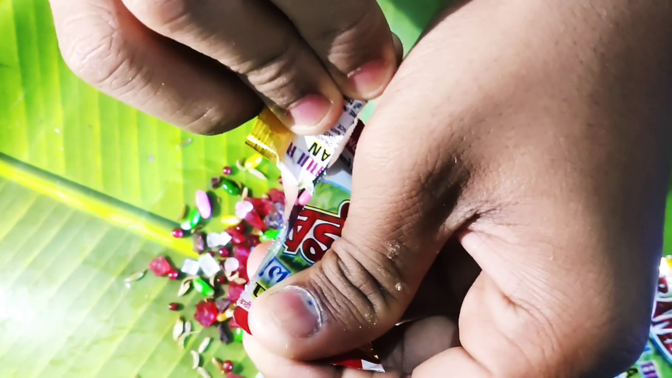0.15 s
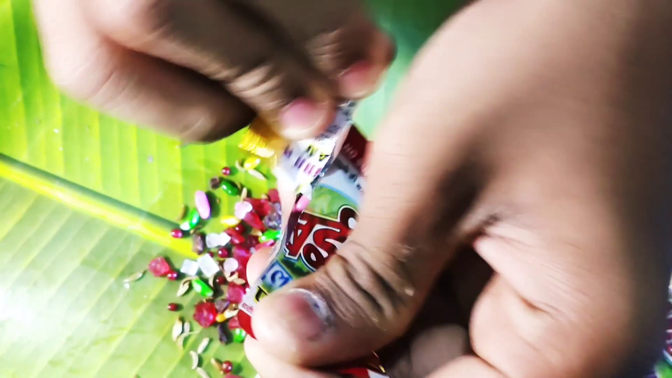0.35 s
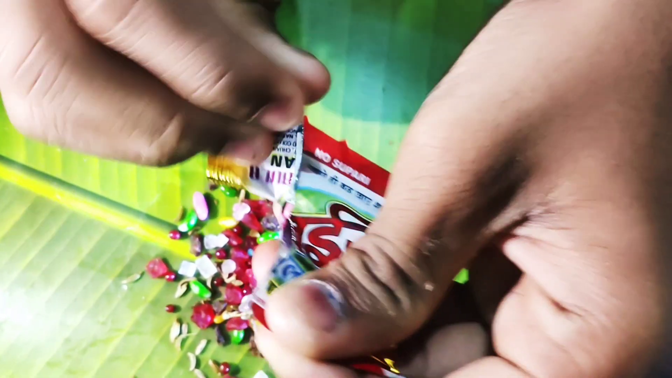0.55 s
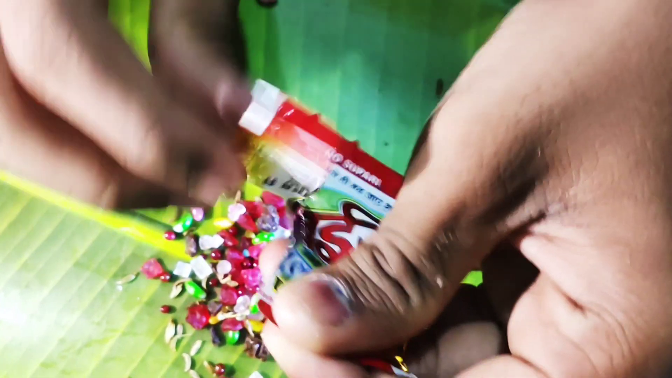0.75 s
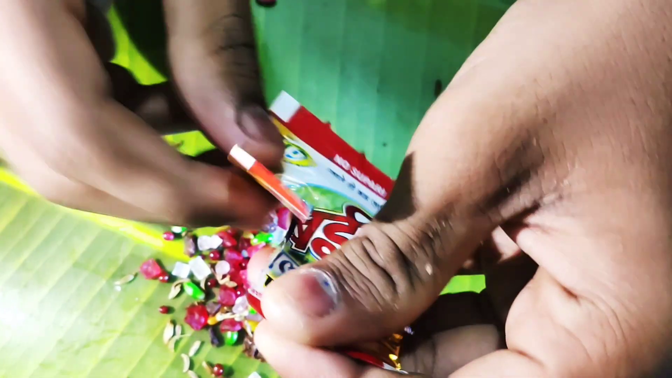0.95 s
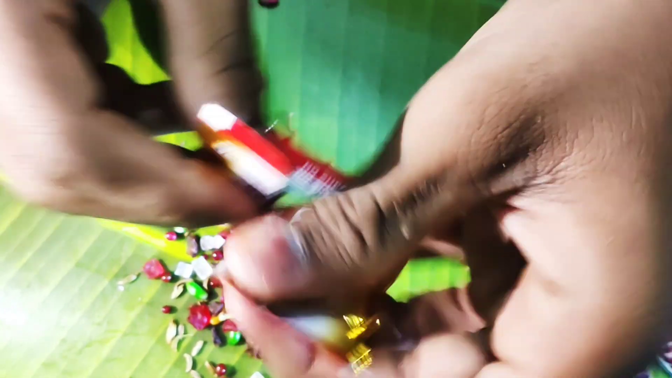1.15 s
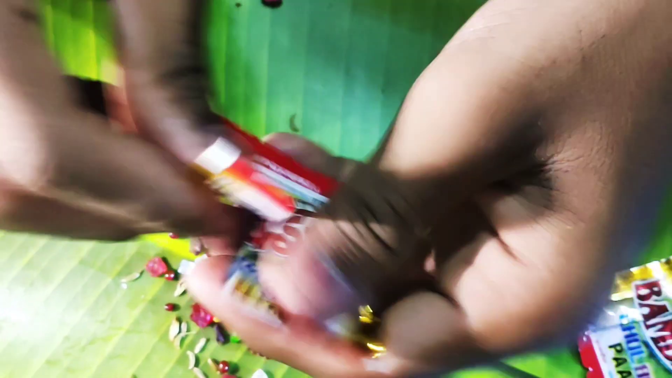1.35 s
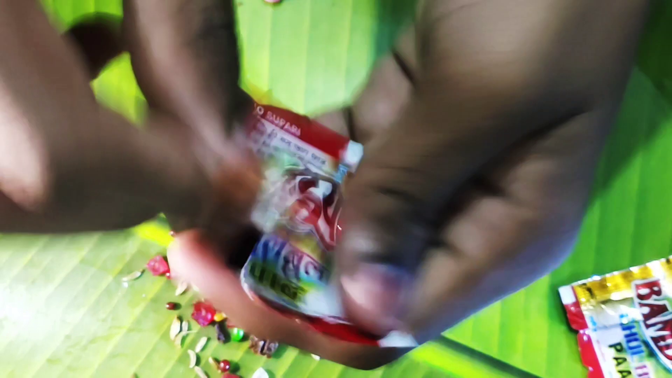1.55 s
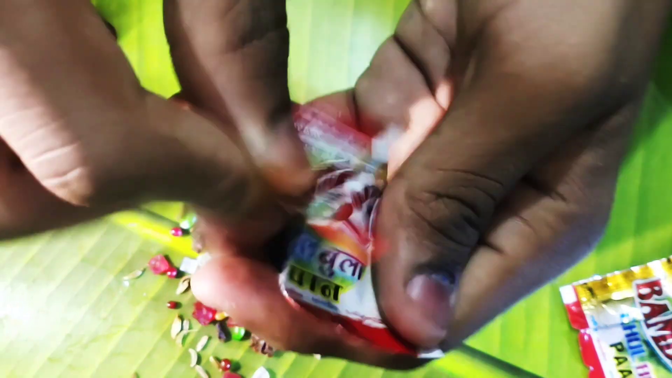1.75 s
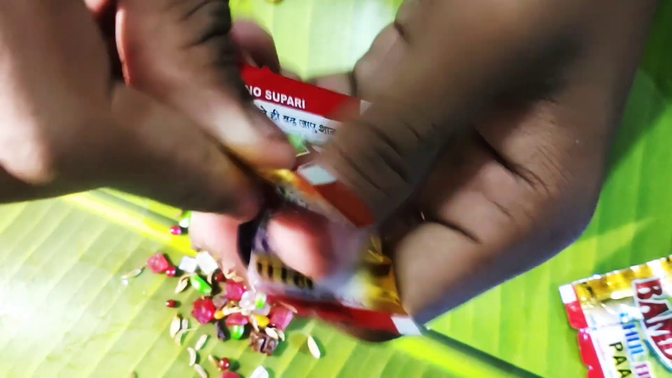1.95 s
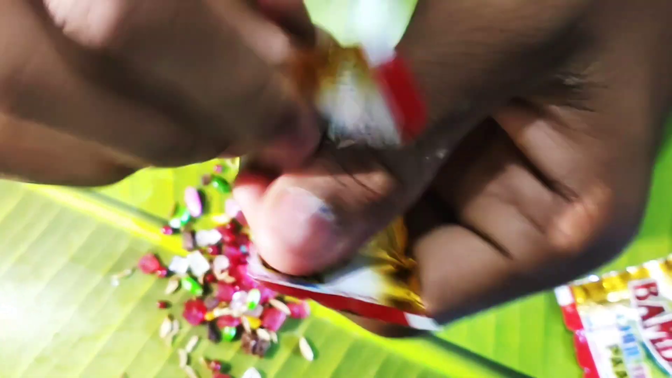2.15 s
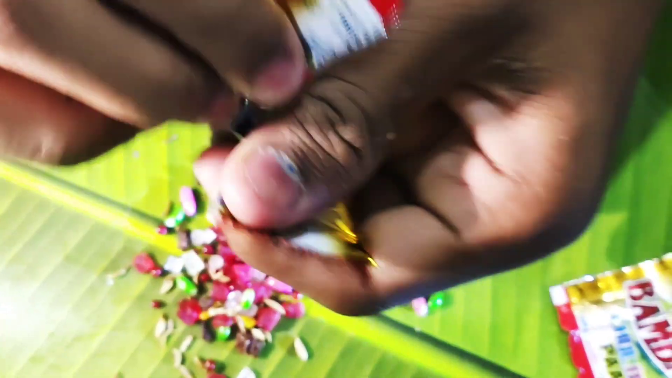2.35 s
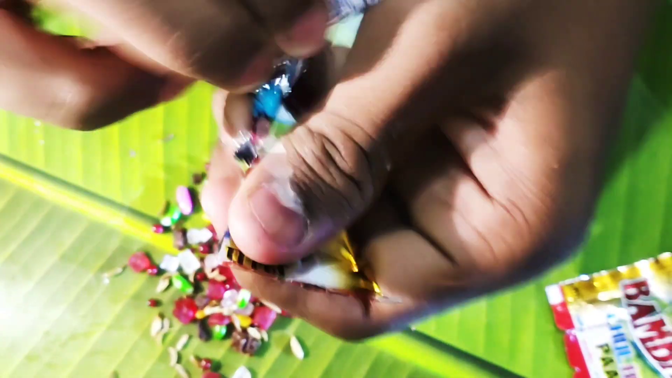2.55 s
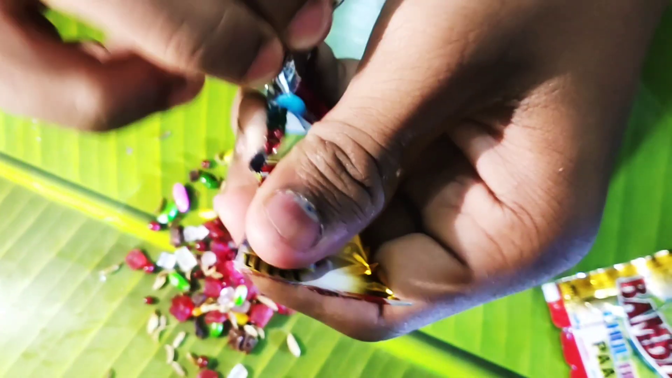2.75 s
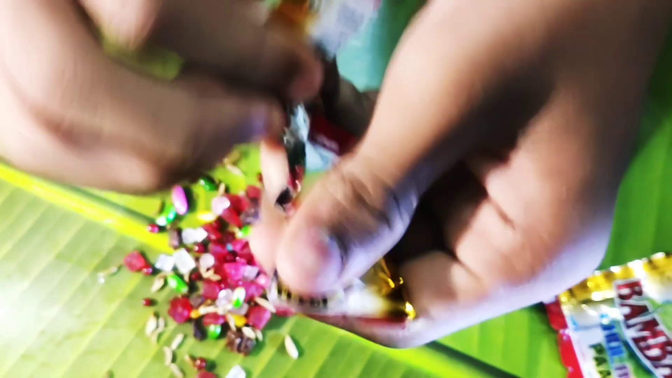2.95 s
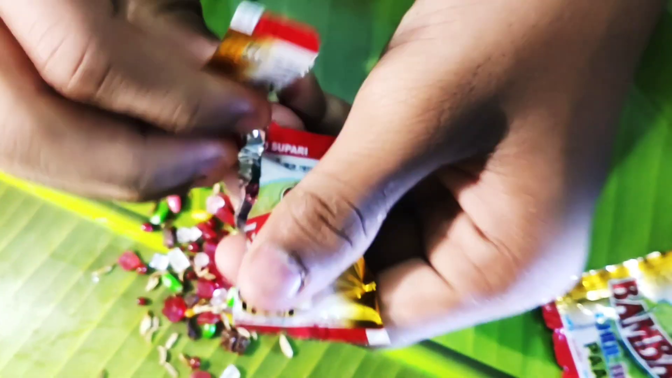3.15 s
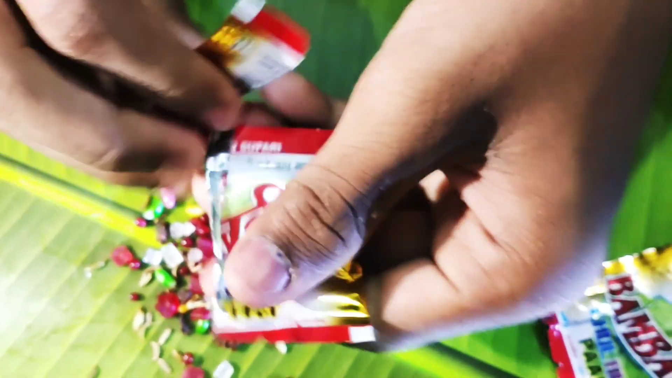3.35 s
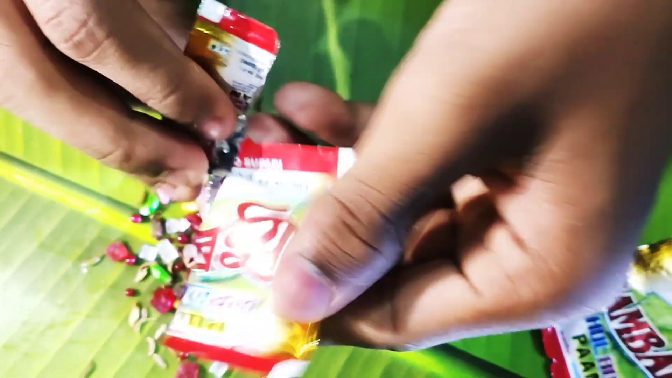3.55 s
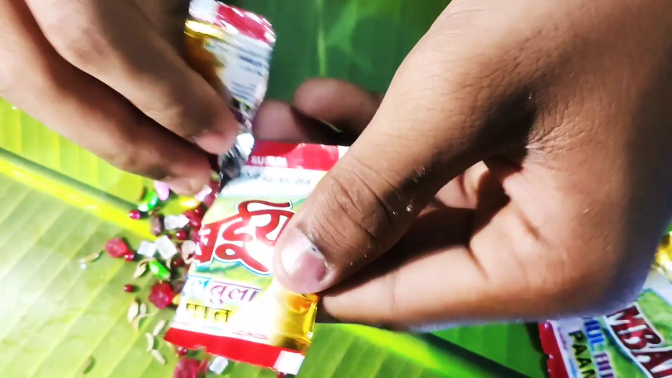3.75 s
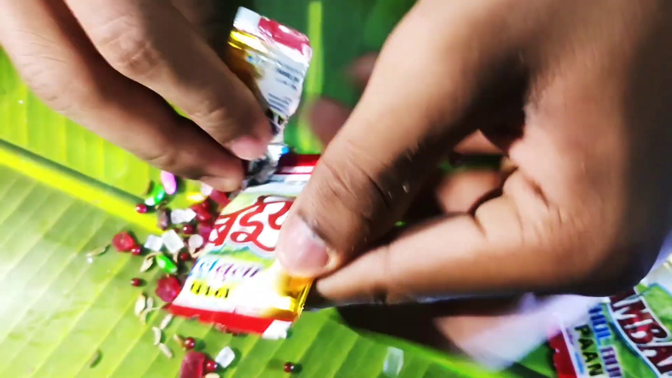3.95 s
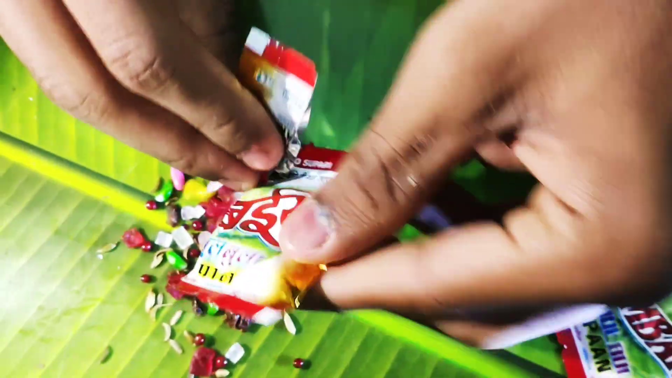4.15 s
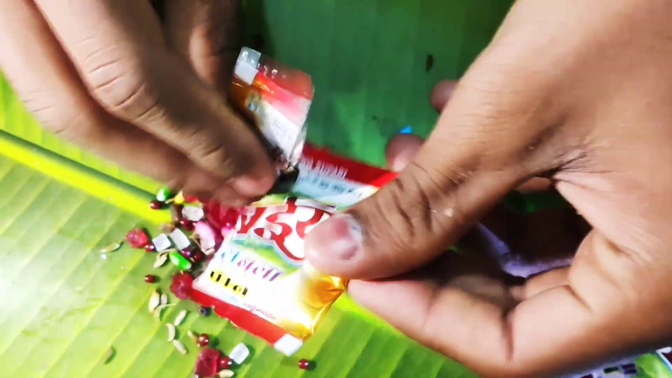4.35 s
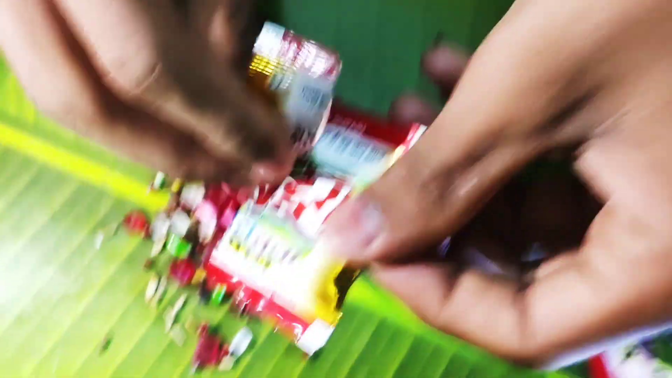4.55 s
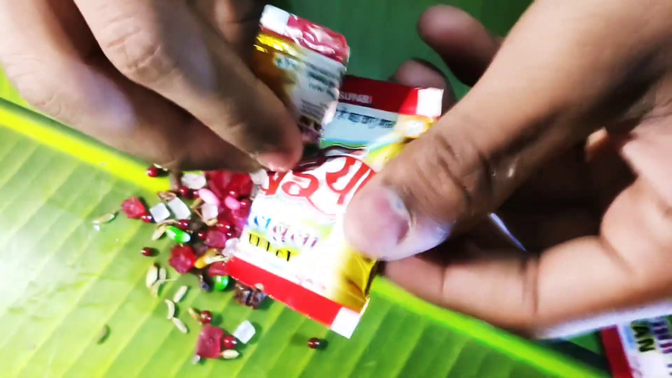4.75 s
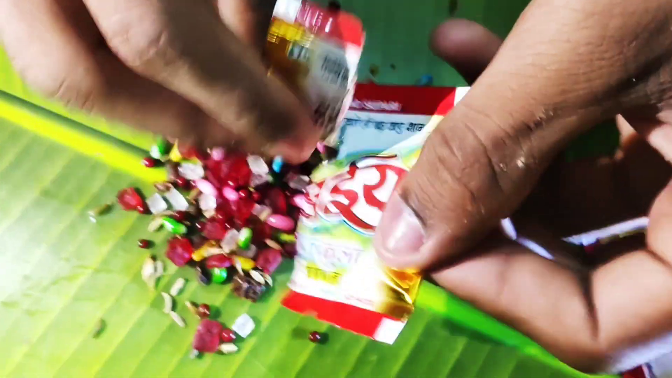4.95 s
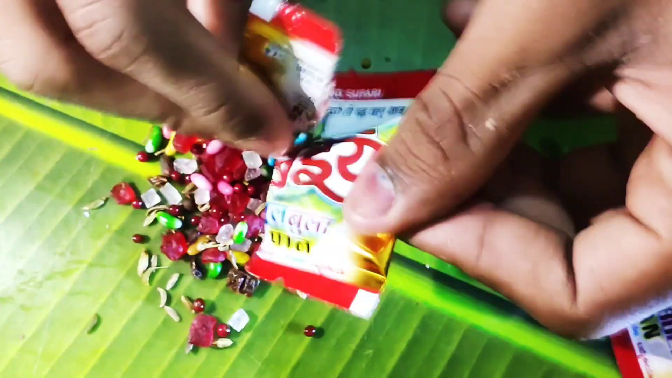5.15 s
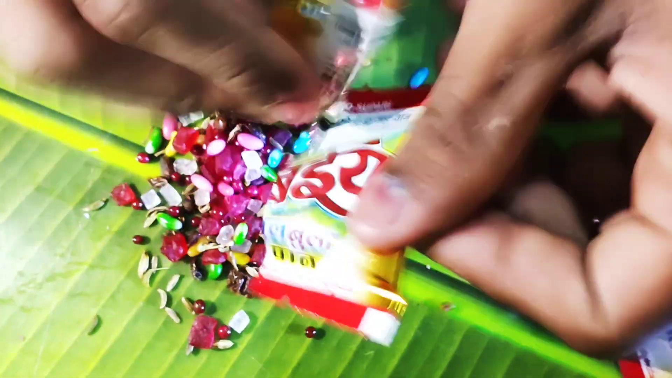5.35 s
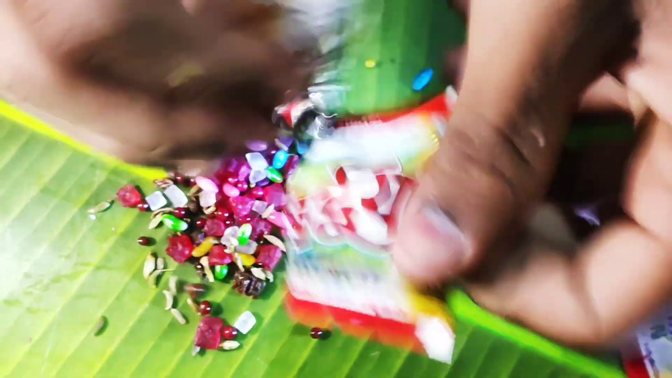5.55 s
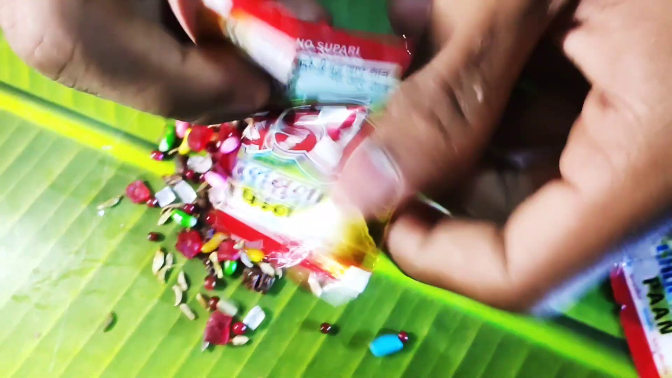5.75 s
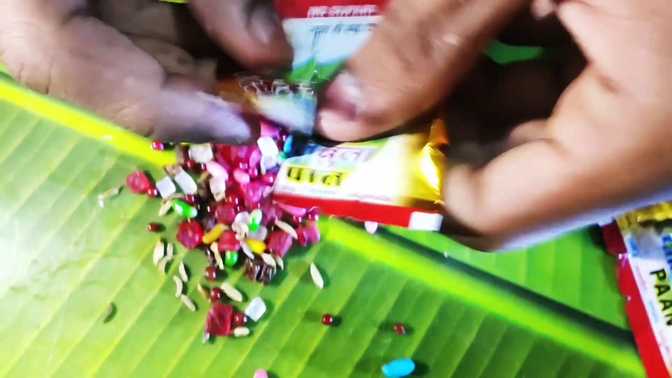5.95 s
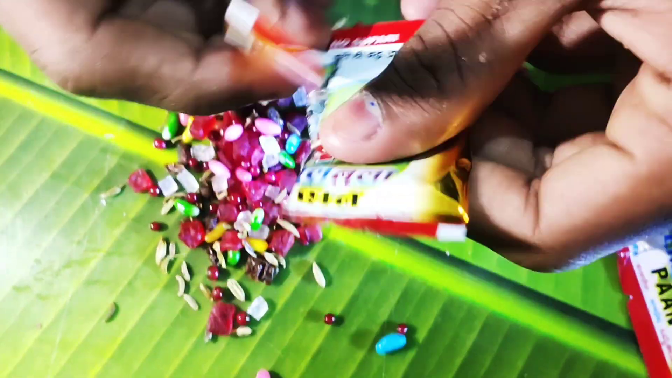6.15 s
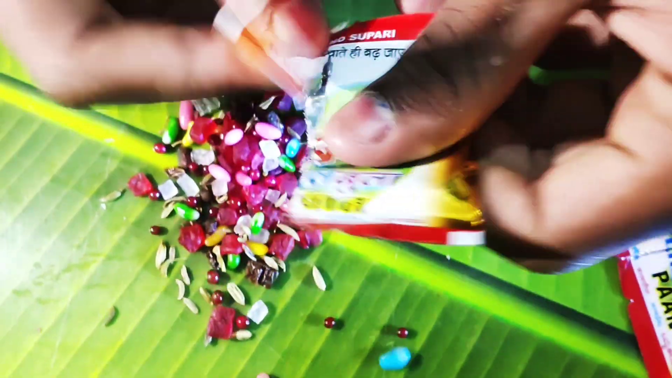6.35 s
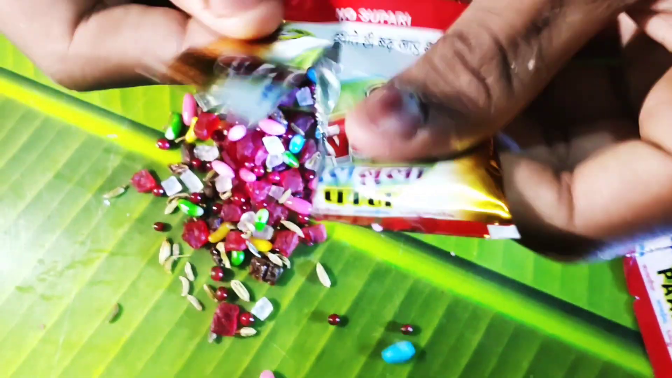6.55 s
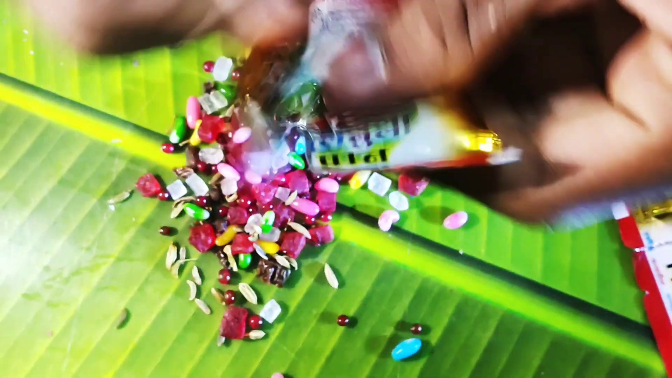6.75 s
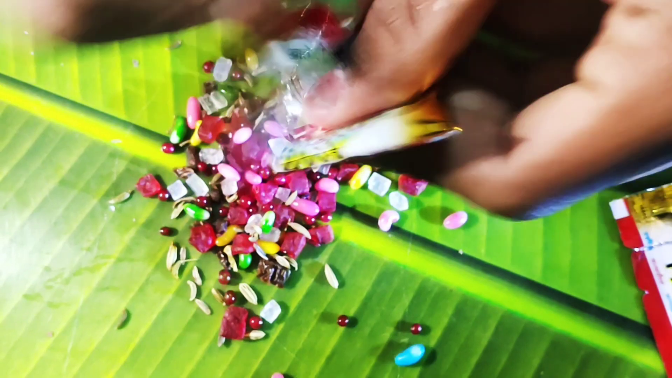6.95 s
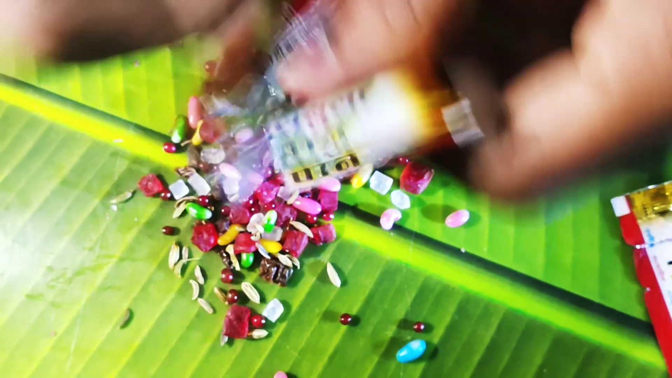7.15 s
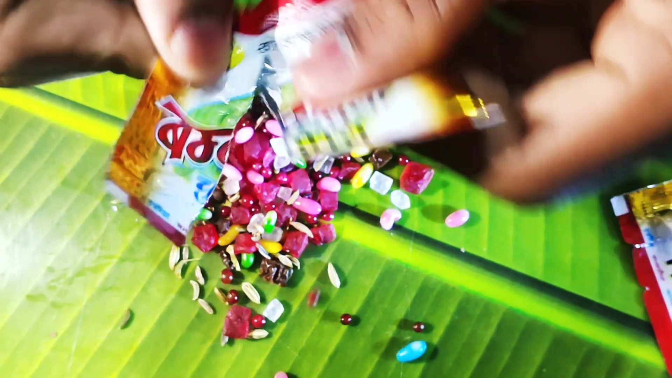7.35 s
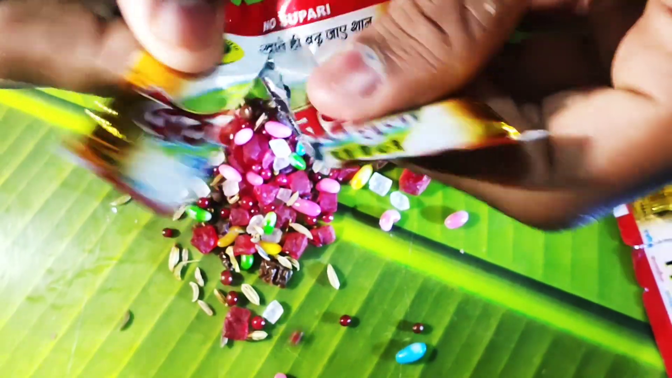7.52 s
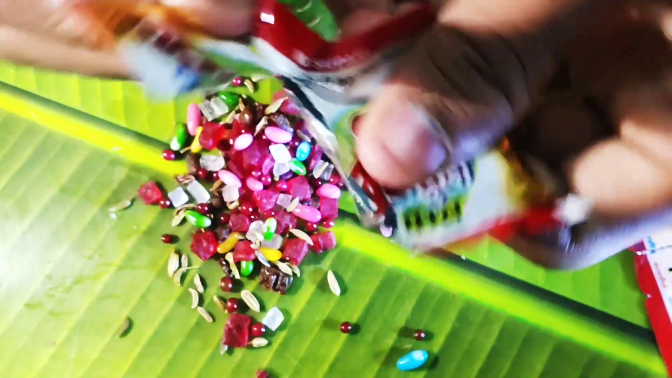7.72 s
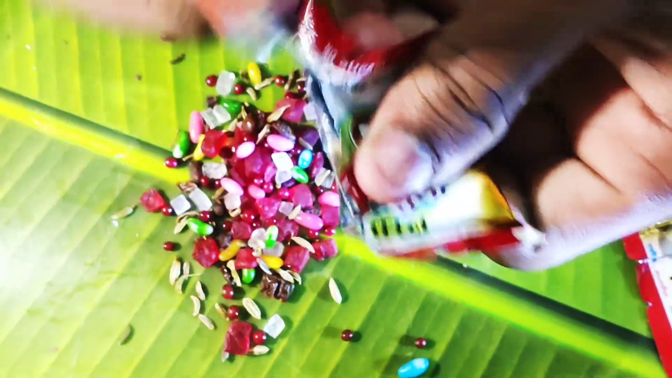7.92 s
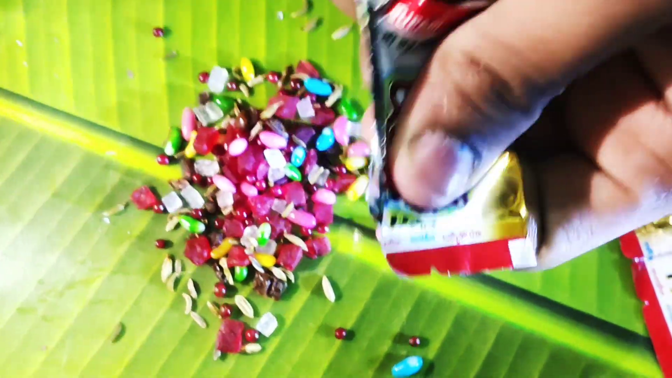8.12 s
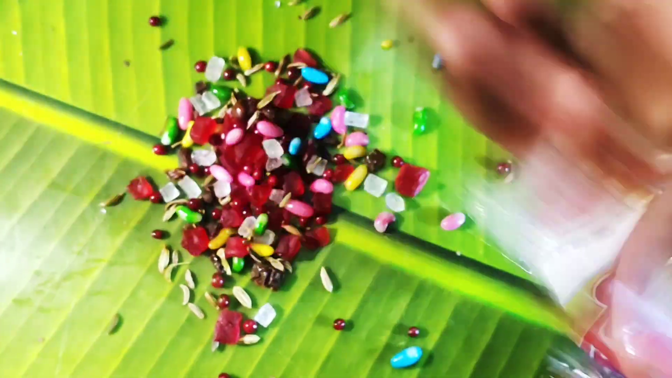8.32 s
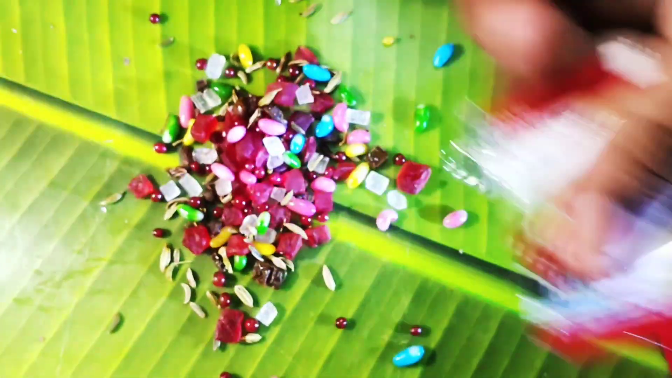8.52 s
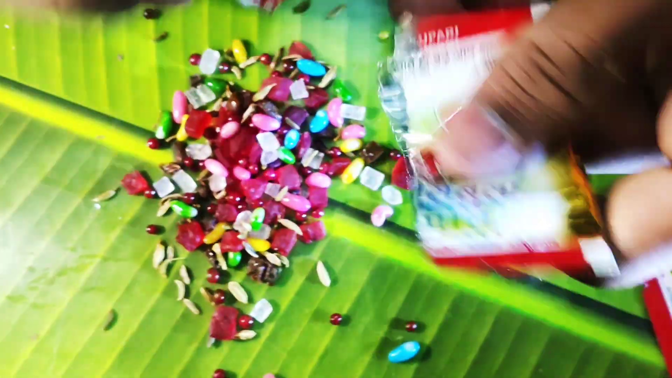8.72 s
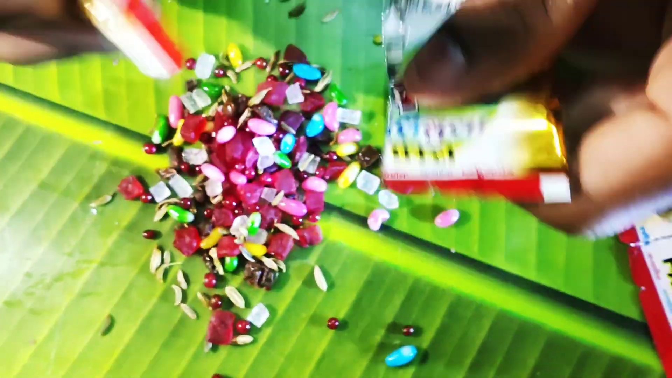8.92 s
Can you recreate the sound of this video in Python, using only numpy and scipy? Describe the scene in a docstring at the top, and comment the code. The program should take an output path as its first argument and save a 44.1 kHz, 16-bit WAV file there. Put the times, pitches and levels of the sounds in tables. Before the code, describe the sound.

Close, crisp crackling of small foil packets being squeezed and torn, clicking irregularly in a small room, ending in a hard burst of snaps.

```python
"""Two hands work a foil-lined plastic sachet close to the microphone in a small room, for nine seconds.
First come dull room noise and a wavering hum, then faint stirring and showers of tiny buckles.
Sharp snaps soon join in: every buckle, big or tiny, is a ringing film panel plus a bright crack.
From three seconds on a hand now and then bumps the recorder, setting its body ringing.
Near the end the hum swells, then a tight burst of strong snaps gives way to a few last ones."""
import sys
import numpy as np
from scipy import signal
from scipy.fft import rfft, irfft
from scipy.io import wavfile
from scipy.ndimage import uniform_filter1d

SR = 44100
rng = np.random.default_rng(int(sys.argv[2]) if len(sys.argv) > 2 else 0)


def to_wav(sig):
    """Store sig (one row per channel, or 1-D mono) as 16-bit WAV at the path in sys.argv[1].

    Samples outside -1..1 are clipped; the rate is SR.
    """
    pcm = np.clip(np.atleast_2d(sig), -1, 1) * 32767
    pcm = np.round(pcm).astype(np.int16)
    wavfile.write(sys.argv[1], SR, pcm.T)  # frames by channels


N = 396018  # length of the scene in samples
GRAIN = int(.016 * SR)  # length of one buckle in samples
HIT_S = .004  # a hit of unit strength has the energy of rms 1 held this long, in seconds


def from_db(db):
    """Turns decibels into a gain."""
    return 10 ** (np.asarray(db) / 20)


def rms_one(x):
    """Scales a sound to an rms of 1."""
    return x / np.sqrt(np.mean(x ** 2) + 1e-20)


def in_time(rows):
    """The columns of a curve, sample by sample."""
    s, *columns = np.transpose(rows)
    return [np.interp(np.arange(N) / SR, s, column) for column in columns]


def colour(x, spectrum, size=4096):
    """Filters with the given spectrum, reacting as early as it can (minimum phase), along the last axis."""
    length = x.shape[-1]
    hz, level_db = np.transpose(spectrum)
    grid = np.maximum(np.fft.rfftfreq(size, 1 / SR), 1)
    gain = from_db(np.interp(np.log(grid), np.log(hz), level_db))
    # folding the cepstrum (the inverse transform of the log spectrum) leaves nothing before time zero
    cepstrum = irfft(np.log(gain))
    cepstrum[1:size // 2] *= 2
    cepstrum[size // 2 + 1:] = 0
    response = irfft(np.exp(rfft(cepstrum)))[:length]
    response = response.reshape((1,) * (x.ndim - 1) + (-1,))
    return signal.fftconvolve(x, response, axes=-1)[..., :length]


def resonance(x, hz, width_hz):
    """A two-pole band-pass, with a gain of 1 at its top."""
    r = np.exp(-np.pi * width_hz / SR)
    feed = np.array([1, 0, -1]) * (1 - r * r) / 2
    feedback = [1, -2 * r * np.cos(2 * np.pi * hz / SR), r * r]
    return signal.lfilter(feed, feedback, x)


def unit_hit(x):
    """Scales each hit to unit strength by its energy."""
    return x / np.sqrt(np.sum(x ** 2, axis=-1, keepdims=True) / (HIT_S * SR) + 1e-20)


def place(times, sounds):
    """Lays the sounds (one a row) on the time line."""
    first = np.round(np.asarray(times) * SR).astype(int)
    at = first[:, None] + np.arange(sounds.shape[1])
    return np.bincount(np.maximum(at, 0).ravel(), sounds.ravel(), N)[:N]


def background(hum_hz=98.3, hum_width_hz=20, whine_hz=598, whine_width_hz=6.7, whine_db=-15,
               waver_db=1.45, waver_hz=2, waver_width_hz=9, drone_hz=335, drone_width_hz=110):
    """Dull, restless room noise, hum, low drone and a faint higher tone: noise through filters."""
    # Colour of the room noise. Each row: pitch in Hz, relative level in dB.
    noise_colour = [(25, -11), (55, -6.5), (85, -5), (160, 0.5), (250, 4.5), (345, -5.5), (405, -14.5),
                    (590, 1), (730, -7), (1300, -6), (2000, -5.5), (2550, -15), (3050, -35), (4200, -43),
                    (6500, -57), (12500, -37), (16000, -64)]
    # Loudness of the room. Each row: time in seconds, noise level before its waver in dB, drone level in dB.
    room_level = [(0, -57, -63.5), (0.8, -57, -67.5), (2, -56, -66), (2.9, -58, -68.5), (3.3, -56.5, -61.5),
                  (3.7, -58.5, -88), (4.2, -57.5, -88), (5.2, -56.5, -70.5), (6.4, -60.5, -76.5),
                  (7.7, -59, -78), (8.3, -56.5, -80.5), (8.6, -65, -91), (8.98, -62, -80)]
    # Loudness of the hum. Each row: time in seconds, level in dB.
    hum_level = [(0, -66.5), (4.2, -66), (4.6, -76), (5, -65.5), (6.2, -57.5), (6.5, -74.5), (7.65, -74),
                 (7.95, -56), (8.5, -68)]

    def narrow(x, hz, width_hz):
        """Steady tone-like noise: two equal resonances in a row, past their first second."""
        return rms_one(resonance(resonance(x, hz, width_hz), hz, width_hz)[SR:])

    noise_db, drone_db = in_time(room_level)
    hum_db, = in_time(hum_level)
    white = rng.standard_normal((5, N + SR))
    waver = narrow(white[3], waver_hz, waver_width_hz)
    noise = rms_one(colour(white[0], noise_colour)[SR:]) * from_db(waver_db * waver)
    hum = narrow(white[1], hum_hz, hum_width_hz)
    whine = rms_one(resonance(white[2], whine_hz, whine_width_hz)[SR:])
    drone = narrow(white[4], drone_hz, drone_width_hz)
    noise_and_whine = from_db(noise_db) * (noise + from_db(whine_db) * whine)
    return from_db(drone_db) * drone + noise_and_whine + from_db(hum_db) * hum


def room(x, wet_db=-10.5, mid_t60=0.52, treble_t60=0.3, first_echo_s=0.008, uneven_db=2,
         turns_per_s=.6, count=8):
    """Wall echoes arrive after a short gap and die sooner in the treble; they shift as the hands move."""
    # Colour of the echo. Each row: pitch in Hz, relative level in dB.
    echo_colour = [(150, -11.5), (900, 5), (2500, -1.5), (6000, 3), (12000, 4.5), (16000, 5)]
    t = np.arange(int(.7 * SR)) / SR
    echoes = rng.standard_normal((count, len(t)))
    # the earliest echoes are the most uneven
    echoes = echoes * from_db(uneven_db * rng.standard_normal((count, len(t))) * np.exp(-t / .04))
    low, high = [signal.sosfilt(signal.butter(2, 6000, kind, fs=SR, output="sos"), echoes)
                 for kind in ("low", "high")]
    # t60: seconds to fall by 60 dB
    responses = low * from_db(-60 * t / mid_t60) - high * from_db(-60 * t / treble_t60)
    responses = responses * (t > first_echo_s)
    responses = responses / np.sqrt(np.sum(responses ** 2, axis=1, keepdims=True))
    responses = colour(responses, echo_colour)
    # the sachet passes through a few positions each second, each with its own echoes
    turn = turns_per_s * np.arange(N) / SR + np.arange(count)[:, None] / count
    nearness = np.maximum(np.cos(2 * np.pi * turn) - .5, 0)
    nearness /= np.sqrt(np.sum(nearness ** 2, axis=0))
    echoed = signal.fftconvolve(x * nearness, responses, axes=1)[:, :N]
    return from_db(wet_db) * echoed.sum(axis=0)


def bumps(chatter_db=-27, chatter_t60=0.26, chatter_hz=450, level_db=2, low_hz=90, count=5,
          judder_s=.022, judder_dulling=0.9):
    """A dying run of soft blows and a dull chatter of skin on the casing set the body's modes ringing."""
    # Bumps on the recorder. Each row: start in seconds, level in dB before level_db is added,
    # brightness of the first blow in Hz, loss in dB from one blow to the next.
    bump_rows = [(3.055, -33, 925, 5.5), (6.462, -47, 394, 9), (7.25, -26, 1700, 4.5),
                 (8.036, -32, 2430, 5), (8.12, -41, 1300, 9), (8.394, -45, 600, 17)]
    # Modes of the recorder's body. Each row: pitch in Hz, typical relative level in dB,
    # time to fall by 60 dB in seconds.
    body_modes = [(137, -20.5, 0.078), (249, -3.5, 0.031), (353, -8.5, 0.051), (445, -11.5, 0.062),
                  (550, -2, 0.015), (874, 7.5, 0.01), (1160, 2, 0.011), (1700, 2, 0.0067)]
    t = np.arange(SR // 6) / SR
    # the skin judders on the casing, duller at each touch
    touches = [(s + k * judder_s, db - k * loss_db, hz * judder_dulling ** k)
               for s, db, hz, loss_db in bump_rows for k in range(count)]
    chatter_filter = signal.butter(1, chatter_hz, fs=SR, output="sos")
    sounds = []
    for s, db, bright_hz in touches:
        chatter = signal.sosfilt(chatter_filter, rng.standard_normal(len(t)))
        push = (t == 0) + chatter * from_db(chatter_db - 60 * t / chatter_t60)
        band = [low_hz, max(bright_hz, 2 * low_hz)]
        push = signal.sosfilt(signal.butter(3, band, "band", fs=SR, output="sos"), push)
        # each touch excites the modes a little differently
        body = sum(np.cos(2 * np.pi * hz * t)
                   * from_db(mode_db + 2 * rng.standard_normal() - 60 * t / t60)
                   for hz, mode_db, t60 in body_modes)
        blow = signal.fftconvolve(push, body)[:len(t)]
        sounds.append(from_db(db + level_db) * unit_hit(blow))
    return place([touch[0] for touch in touches], np.array(sounds))


def buckles(panel_hz, t60, jag_db, rise_s=0.00004, spread=0.27, broad_width_hz=2600, sharp_width_hz=380,
            crease_hz=11800, crease_width_hz=2300, crease_db=-2, bounce_s=.0009, bounce_share=0.43,
            sheet_ratio=.42, sheet_width_hz=500, sheet_share=0.19):
    """A crease gives way in a brief run of jagged slips; returns the panel ring and the crack of each."""
    # Colours of the panel ring and of the crack. Each row: pitch in Hz, relative level in dB.
    panel_colour = [(120, -14), (400, -6.5), (700, -6), (1000, 3), (1400, -0.5), (2500, 1.5), (3300, -3),
                    (5000, -10.5), (6300, -27.5), (9000, -50)]
    crack_colour = [(4000, -28.5), (6600, -22.5), (7400, -18.5), (8200, -11), (10200, -8), (12200, 0.5),
                    (13500, -1.5), (15200, -11.5), (16000, -1.5)]
    t = np.arange(GRAIN) / SR
    chance = rng.standard_normal((len(panel_hz), 3, GRAIN))
    life = t60 * np.exp(spread * chance[:, 2, :1])
    slips = chance[:, 0] * from_db(jag_db * chance[:, 1] - 60 * t / life)
    slips = slips * (1 - np.exp(-t / rise_s))
    # the palm and the table throw each slip back a moment later
    lags = (bounce_s * SR * np.exp(.6 * np.tanh(chance[:, 2, 2]))).astype(int)
    slips = np.array([slip + bounce_share * np.pad(slip, (lag, 0))[:GRAIN]
                      for slip, lag in zip(slips, lags)])
    # the facet gives a broad thwack with a sharper ring on top
    panels = np.array([resonance(slip, hz, broad_width_hz) + resonance(slip, hz, sharp_width_hz)
                       for slip, hz in zip(slips, panel_hz)])
    # the wider sheet around the facet rings lower
    panels += sheet_share * np.array([resonance(slip, sheet_ratio * hz, sheet_width_hz)
                                      for slip, hz in zip(slips, panel_hz)])
    # the crease adds a high pitch of its own
    high_hz = crease_hz * np.exp(0.4 * np.tanh(chance[:, 2, 1]))
    creases = np.array([slip + from_db(crease_db) * resonance(slip, hz, crease_width_hz)
                        for slip, hz in zip(slips, high_hz)])
    return unit_hit(colour(panels, panel_colour)), unit_hit(colour(creases, crack_colour))


def kneading(attack_s=0.017, release_db_per_s=241, held_from_s=0.29, held_fade_s=.2,
             held_ring_db=-69, held_crack_db=-83):
    """Panel and crack strength of the crinkling over time: squeezes on top of the stir of the held film."""
    # Squeezes of the fingers. Each row: time of reaching full strength in seconds,
    # time held in seconds, panel ring level in dB, crack level in dB.
    squeezes = [(0, 0.003, -63, -62.5), (0.465, 0.059, -61.5, -84), (0.553, 0.064, -62.5, -64),
                (0.853, 0.082, -59.5, -58.5), (1.128, 0.23, -57.5, -62), (1.47, 0.6, -53.5, -62.5),
                (1.72, 0.18, -48.5, -56), (1.967, 0.48, -54.5, -60), (2.648, 0.17, -53, -51),
                (3.007, 0.19, -58.5, -60.5), (3.174, 0.053, -48.5, -48), (3.372, 0.19, -58, -59),
                (3.77, 0.24, -56, -58.5), (4.105, 0.093, -49, -49), (4.23, 0.17, -45, -46),
                (4.436, 0.2, -51, -54), (4.698, 0.13, -42.5, -42.5), (4.88, 0.087, -48, -49.5),
                (5.045, 0.49, -60, -62), (5.401, 0.18, -44, -48), (5.612, 0.29, -52, -56.5),
                (6.028, 0.05, -49, -49.5), (6.147, 0.081, -58, -62), (6.609, 0.32, -55.5, -56),
                (6.872, 0.12, -43, -42), (7.119, 0.21, -54.5, -48), (7.254, 0.08, -40, -42.5),
                (7.378, 0.032, -44.5, -42.5), (7.523, 0.037, -54.5, -55.5), (7.759, 0.04, -57.5, -51),
                (8.034, 0.16, -57.5, -62), (8.388, 0.04, -48, -49), (8.563, 0.1, -62, -55.5),
                (8.792, 0.05, -53, -62)]
    t = np.arange(0, N, 32) / SR
    start, length, ring_level, crack_level = np.transpose(squeezes)[:, :, None]
    # a squeeze builds quickly, is held and dies away
    age = t - start
    release = from_db(-release_db_per_s * np.maximum(age - length, 0))
    shape = np.clip(1 + age / attack_s, 0, 1) * release
    # between squeezes the held film still stirs
    held = np.clip((t - held_from_s) / held_fade_s, 0, 1)
    strengths = []
    for level, held_db in ((ring_level, held_ring_db), (crack_level, held_crack_db)):
        strength = (shape * from_db(level)).max(axis=0) + from_db(held_db) * held
        strengths.append(np.interp(np.arange(N) / SR, t, strength))
    return strengths


def crinkle(rest_per_s=110, busy_db=-60, rate_power=.4, size_db=5.5, panel_hz=2350, pitch_spread=0.31,
            tint_db=-2.0, deepening=.05, clump_db=5, clump_s=.008, count=600):
    """Showers of tiny buckles: harder kneading makes them louder, denser and deeper."""
    ring_gain, crack_gain = kneading()
    effort = np.maximum(ring_gain / from_db(busy_db), 1)
    # one buckle sets off its neighbours, so they come in clumps
    clumps = np.interp(np.arange(N) / SR / clump_s, np.arange(N), rng.standard_normal(N))
    per_s = rest_per_s * effort ** rate_power * from_db(clump_db * clumps)
    # a stock of buckles, from low to high
    pitches = np.geomspace(700, 5500, count)
    rings, cracks = buckles(pitches, t60=0.025, jag_db=5.0)
    # some are duller, some crisper
    tint = from_db(tint_db * rng.standard_normal((count, 1)))
    rings, cracks = rings / tint, cracks * tint
    born = rng.random(N)
    size, detune = rng.standard_normal((2, N))
    hz = panel_hz * np.exp(pitch_spread * detune) / effort ** deepening
    kind = np.minimum(np.searchsorted(pitches, hz), count - 1)
    at = np.flatnonzero(born < per_s / SR)
    strength = from_db(size_db * np.minimum(size[at], 2))
    # the work of the fingers is shared among the buckles of each moment
    energy = np.bincount(at, strength ** 2, N) * HIT_S * SR
    window = int(.05 * SR)
    shared = uniform_filter1d(uniform_filter1d(energy, window), window)
    strength = (strength / np.sqrt(shared[at] + 1e-9))[:, None]
    ring = place(at / SR, rings[kind[at]] * strength)
    crack = place(at / SR, cracks[kind[at]] * strength)
    return ring * ring_gain + crack * crack_gain


def snaps(ring_db=-3.0, crack_db=3.5, t60=0.011, quickening=0.047, sheet_db=-7, sheet_growth=0.56,
          firm_db=-32):
    """The big buckles, each with a panel of its own size; the brighter one is, the sooner it is over."""
    # The loud single buckles. Each row: start in seconds, panel ring level in dB before ring_db is added,
    # crack level in dB before crack_db is added, panel pitch in Hz.
    snap_rows = [(0.567, -41.5, -55, 2520), (0.6152, -46, -45, 4540), (0.6361, -27.5, -36.5, 2600),
                 (0.8761, -37, -37.5, 1630), (1.1236, -33.5, -47.5, 2240), (1.263, -38.5, -49, 1750),
                 (1.6005, -39, -55, 1140), (1.7086, -34, -61, 2500), (1.7121, -26, -33.5, 2900),
                 (1.793, -33.5, -37, 2420), (1.8212, -28, -60, 2500), (1.8264, -31.5, -35.5, 2500),
                 (1.853, -36, -48, 2500), (1.91, -42, -48, 2200), (2.0494, -35.5, -53, 2270),
                 (2.0657, -34, -42.5, 2360), (2.137, -63, -36, 2050), (2.2199, -35.5, -42.5, 1610),
                 (2.2573, -42, -43.5, 2650), (2.3183, -44, -41.5, 1410), (2.354, -32.5, -43, 2610),
                 (2.4937, -51, -39, 2570), (2.5223, -32.5, -45, 2420), (2.5954, -38.5, -46.5, 3720),
                 (2.6493, -33.5, -32.5, 2190), (2.6631, -35, -32, 1970), (2.7026, -36, -35, 2630),
                 (2.717, -26, -24.5, 2850), (2.9558, -40.5, -63, 2500), (3.013, -48, -46.5, 1740),
                 (3.1088, -34, -36.5, 2260), (3.1625, -30, -42, 1530), (3.1658, -24.5, -27, 2280),
                 (3.3664, -30.5, -36, 2350), (3.4595, -35, -50, 2820), (3.5089, -34, -41.5, 3280),
                 (3.826, -36.5, -59, 1680), (3.9281, -40.5, -46.5, 2300), (4.095, -34, -38, 3160),
                 (4.105, -36, -38.5, 2920), (4.1638, -40.5, -41, 1530), (4.2019, -40, -41, 1330),
                 (4.2432, -35.5, -29, 3400), (4.3592, -32, -61, 2430), (4.505, -34, -34.5, 3040),
                 (4.5632, -26, -38, 2440), (4.5707, -29, -37, 2340), (4.6808, -26, -39, 2220),
                 (4.698, -38, -37.5, 2000), (4.9592, -36.5, -29, 3230), (5.0414, -33.5, -44, 1640),
                 (5.1197, -29, -35, 2090), (5.3527, -37, -55.5, 1950), (5.3778, -30, -43, 2130),
                 (5.3927, -35, -44, 1240), (5.429, -36, -35, 2320), (5.472, -36, -39.5, 2250),
                 (5.508, -27.5, -33.5, 2220), (5.5516, -28.5, -36, 2160), (5.5664, -34, -38, 2050),
                 (5.6682, -29.5, -37.5, 2190), (5.763, -52, -38, 1470), (5.8078, -42.5, -56, 3070),
                 (5.849, -32.5, -39, 1890), (5.8541, -30.5, -37, 3750), (5.8953, -36.5, -43, 3300),
                 (5.9849, -27, -35.5, 2800), (6.0087, -26, -40, 2620), (6.021, -35, -50, 2300),
                 (6.033, -23, -29, 2720), (6.178, -41.5, -60, 2220), (6.2287, -49, -40, 2110),
                 (6.377, -58, -48, 2400), (6.483, -55, -50, 3000), (6.5506, -43, -62, 1140),
                 (6.6187, -43, -45, 1700), (6.7036, -40, -65, 1170), (6.859, -35, -43, 2470),
                 (6.8815, -46, -42, 2230), (6.9228, -34, -33.5, 1740), (6.9539, -39, -34.5, 1810),
                 (6.9784, -26, -27.5, 2200), (7.018, -32.5, -37, 2500), (7.089, -31.5, -40.5, 2130),
                 (7.1217, -35.5, -31, 4410), (7.127, -31.5, -32, 2000), (7.2046, -30, -32.5, 1870),
                 (7.2124, -33, -37, 2040), (7.2322, -30, -38, 1860), (7.2971, -26.5, -35, 1060),
                 (7.3204, -33, -41, 1970), (7.3297, -27, -39, 1700), (7.4272, -37, -52, 1960),
                 (7.502, -37.5, -51, 2950), (7.5622, -41.5, -56, 1860), (7.7046, -41.5, -84, 1820),
                 (7.7654, -39, -41, 1630), (7.889, -30, -43, 2500), (8.16, -40.5, -34.5, 4080),
                 (8.1714, -35, -57, 1820), (8.354, -50, -52, 2470), (8.3918, -24, -28, 2550),
                 (8.395, -20.5, -23, 2780), (8.4, -21, -26, 2240), (8.4033, -29, -32, 1410),
                 (8.406, -29.5, -29.5, 1250), (8.4294, -47, -44, 1300), (8.455, -32.5, -30.5, 2600),
                 (8.7757, -41.5, -39.5, 3220), (8.831, -41, -50, 4860)]
    s, ring_level, crack_level, panel_hz = np.transpose(snap_rows)
    life = t60 * np.exp(-quickening * np.clip(crack_level - ring_level, -4, 20))
    # a stronger snap shakes more of the sheet
    sheet = from_db(sheet_db + sheet_growth * (ring_level - firm_db))
    ring, crack = buckles(panel_hz, life[:, None], jag_db=4.5, spread=0.094, sharp_width_hz=550,
                          sheet_share=sheet[:, None])
    ring = ring * from_db(ring_level + ring_db)[:, None]
    crack = crack * from_db(crack_level + crack_db)[:, None]
    return place(s, ring + crack)


def scene():
    """The sachet and its echo, the bumps and the background."""
    sachet = snaps() + crinkle()
    return (sachet + room(sachet) + bumps() + background())[None]


def record(dry, cutoff_hz=15700):
    """The top is cut steeply."""
    return signal.sosfilt(signal.ellip(10, .2, 70, cutoff_hz, fs=SR, output="sos"), dry)


dry = scene()
out = record(dry)
to_wav(out)
```